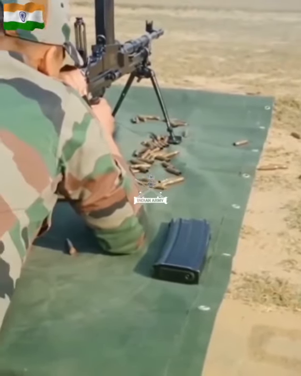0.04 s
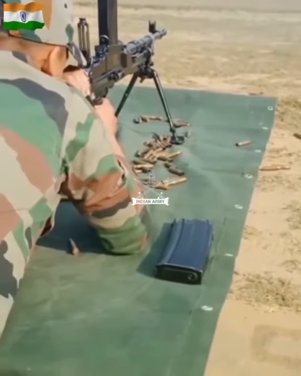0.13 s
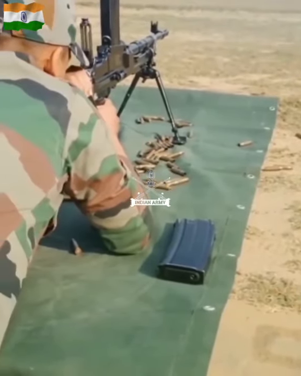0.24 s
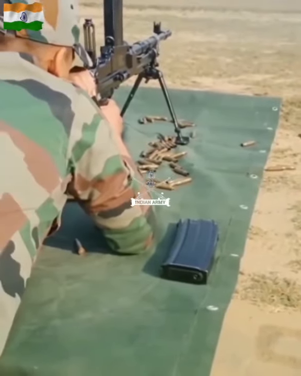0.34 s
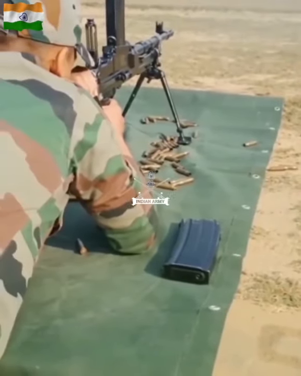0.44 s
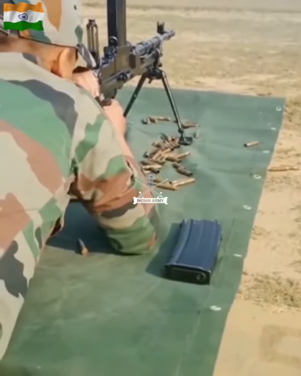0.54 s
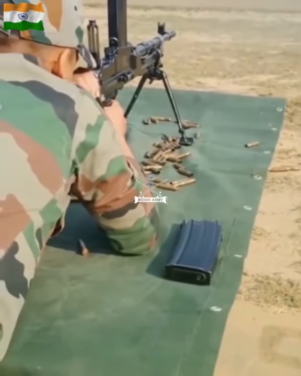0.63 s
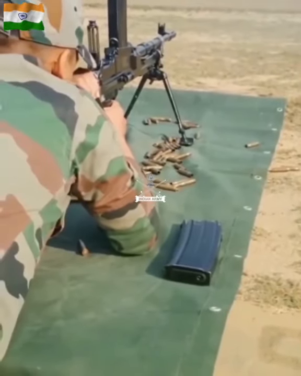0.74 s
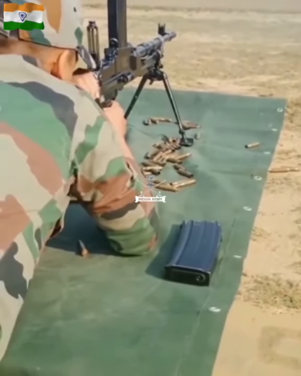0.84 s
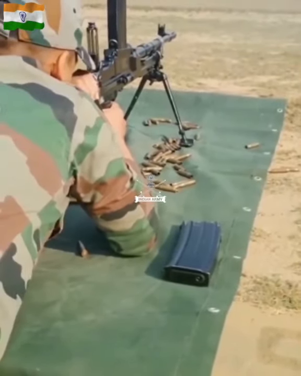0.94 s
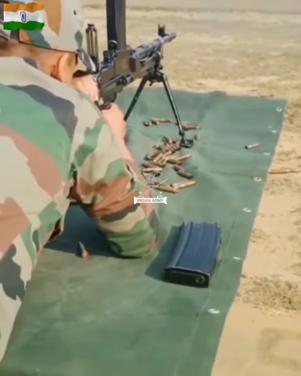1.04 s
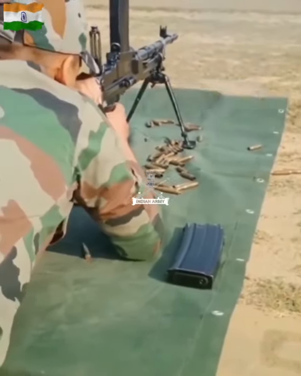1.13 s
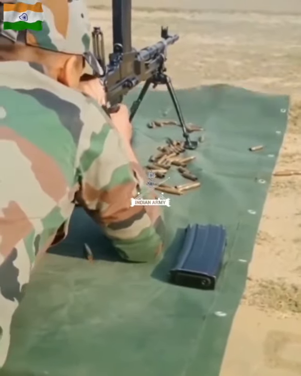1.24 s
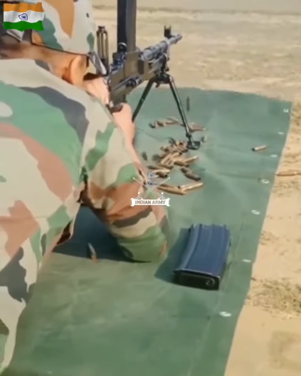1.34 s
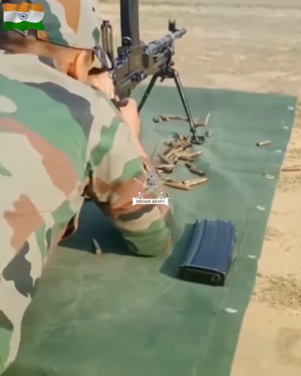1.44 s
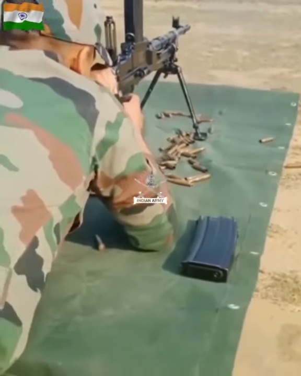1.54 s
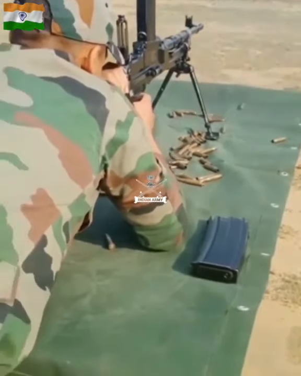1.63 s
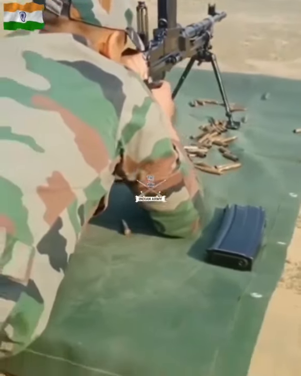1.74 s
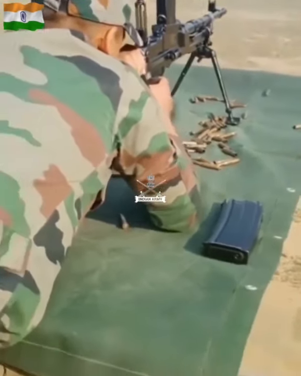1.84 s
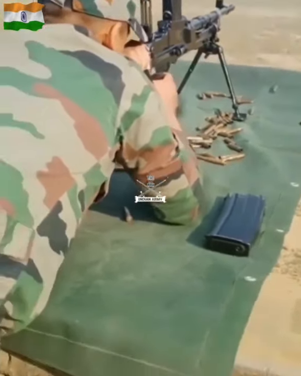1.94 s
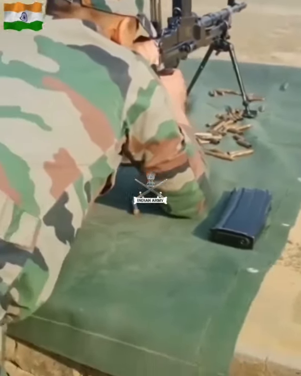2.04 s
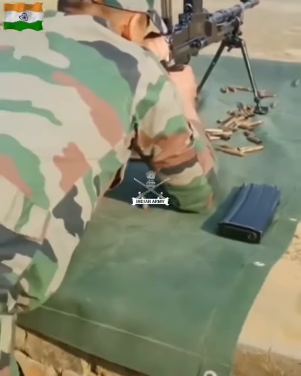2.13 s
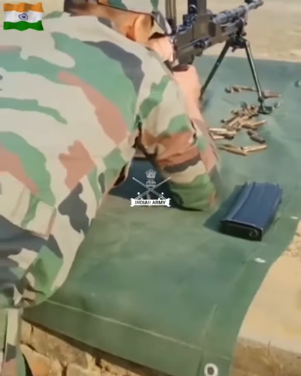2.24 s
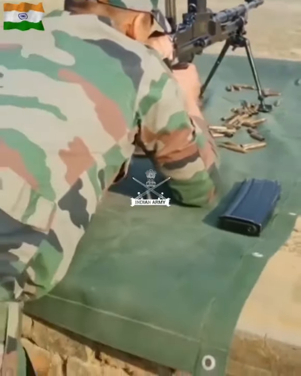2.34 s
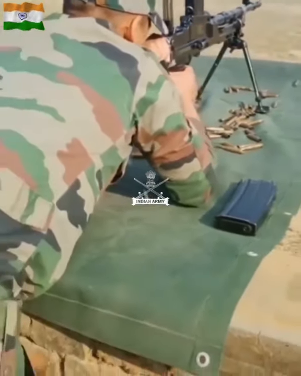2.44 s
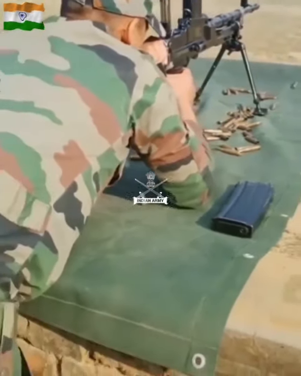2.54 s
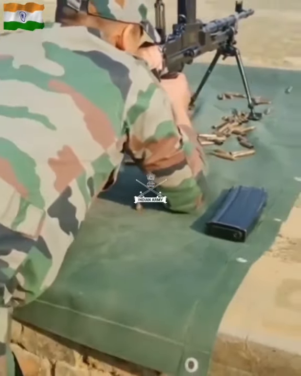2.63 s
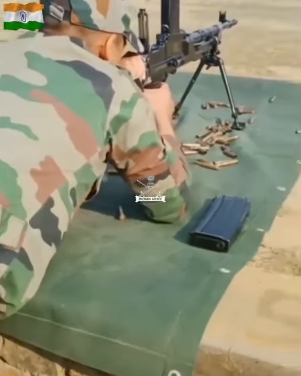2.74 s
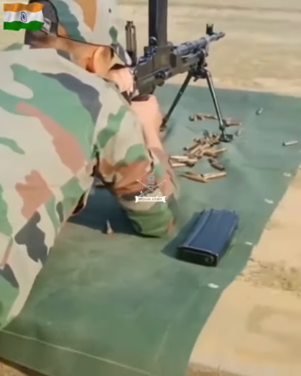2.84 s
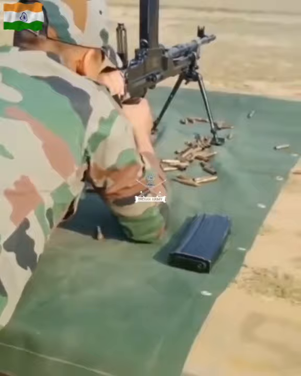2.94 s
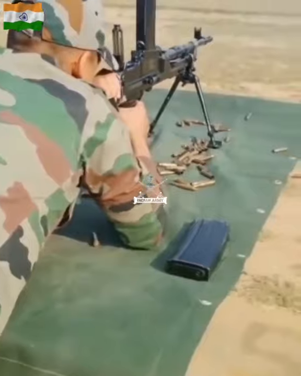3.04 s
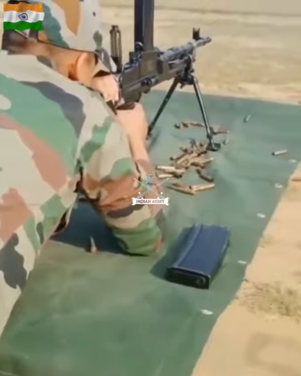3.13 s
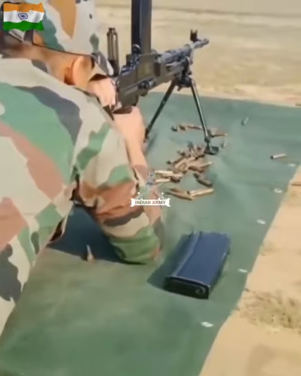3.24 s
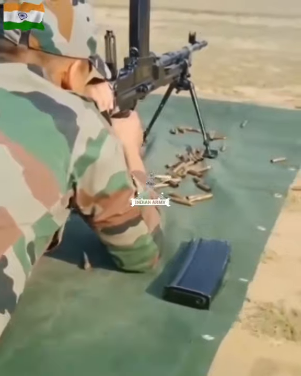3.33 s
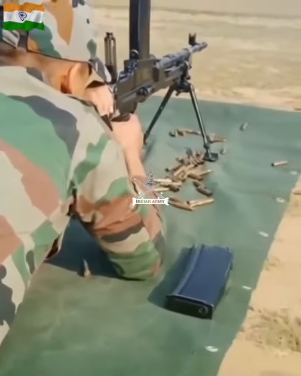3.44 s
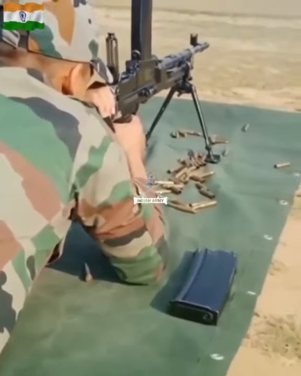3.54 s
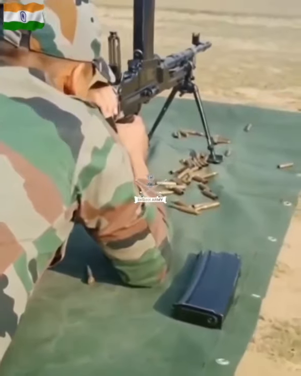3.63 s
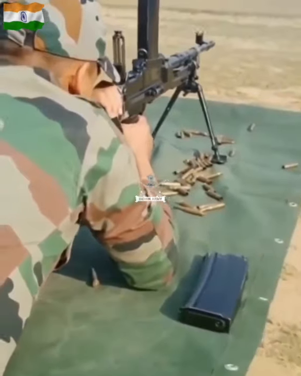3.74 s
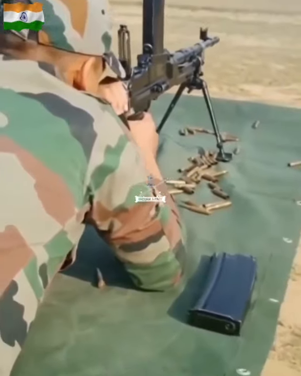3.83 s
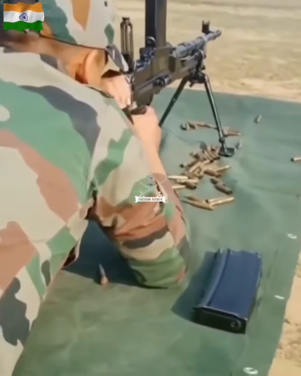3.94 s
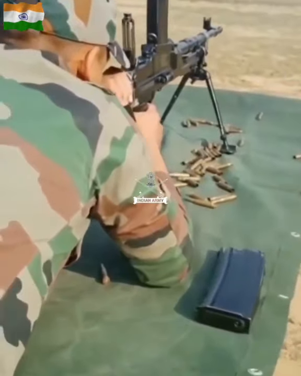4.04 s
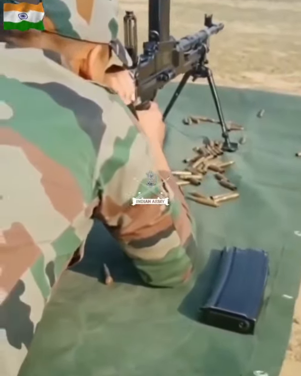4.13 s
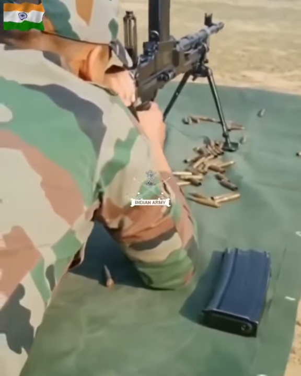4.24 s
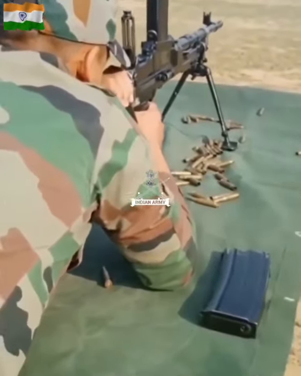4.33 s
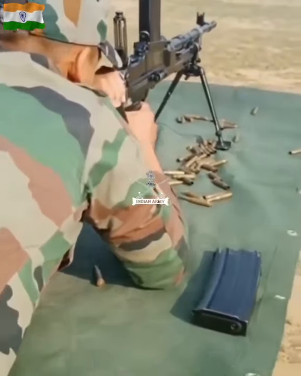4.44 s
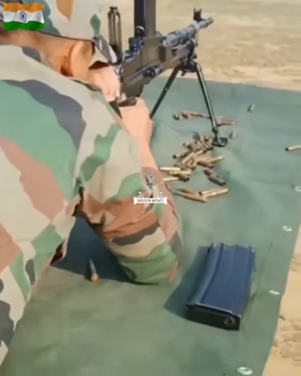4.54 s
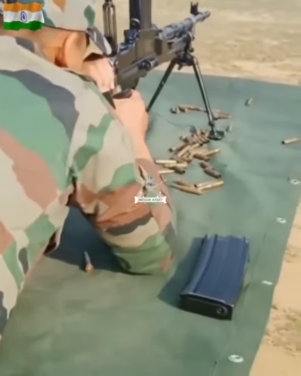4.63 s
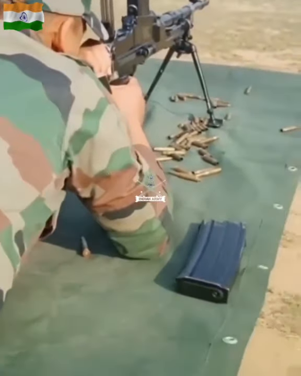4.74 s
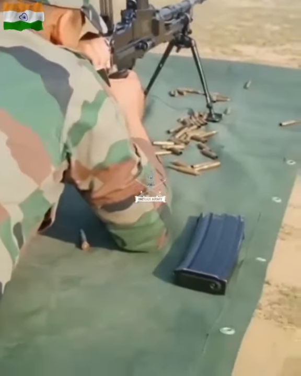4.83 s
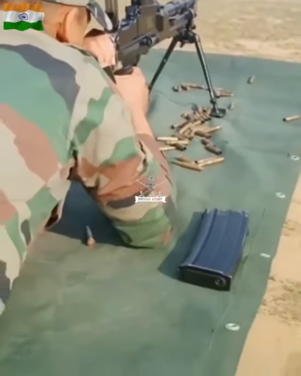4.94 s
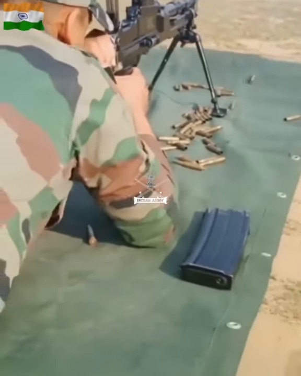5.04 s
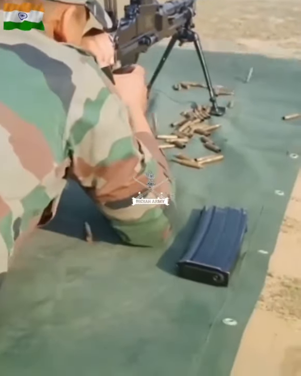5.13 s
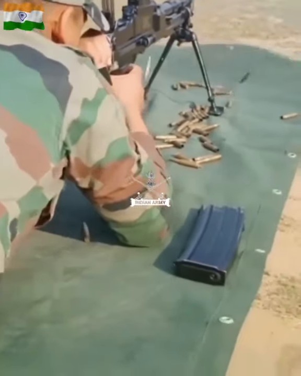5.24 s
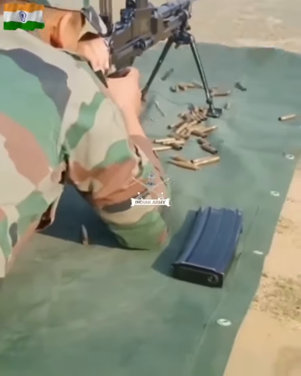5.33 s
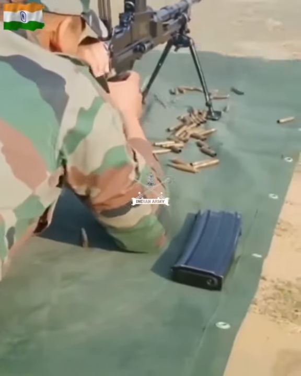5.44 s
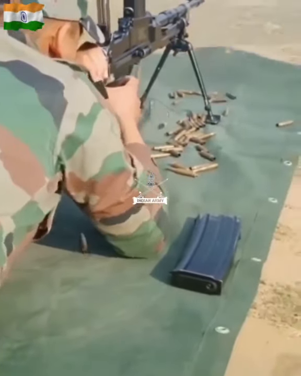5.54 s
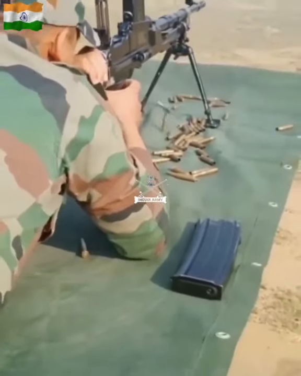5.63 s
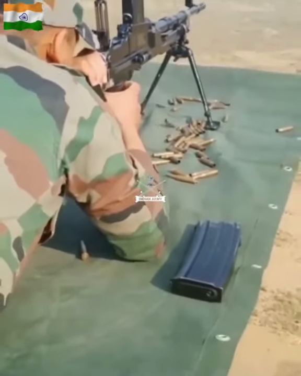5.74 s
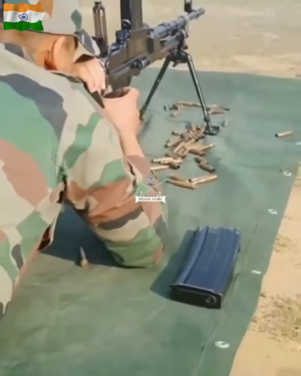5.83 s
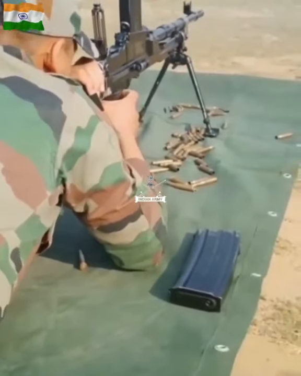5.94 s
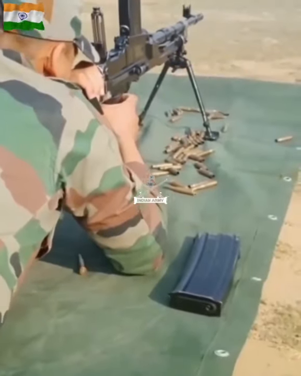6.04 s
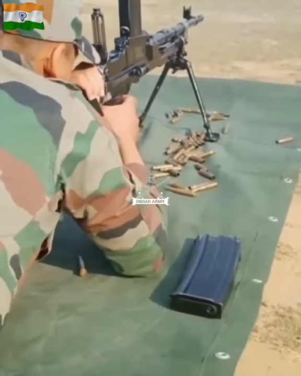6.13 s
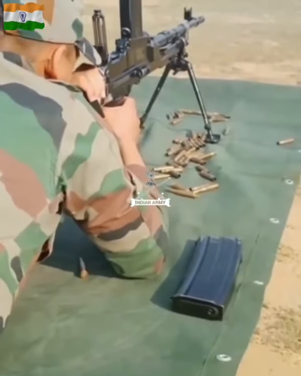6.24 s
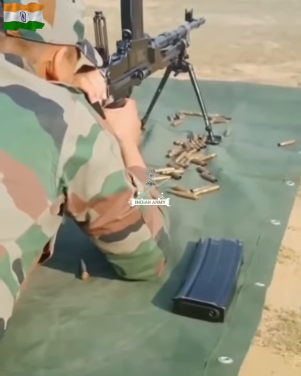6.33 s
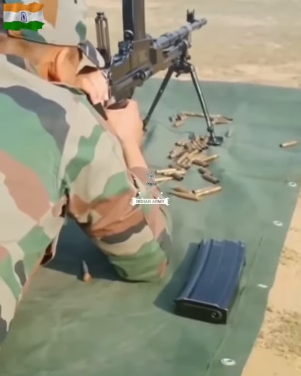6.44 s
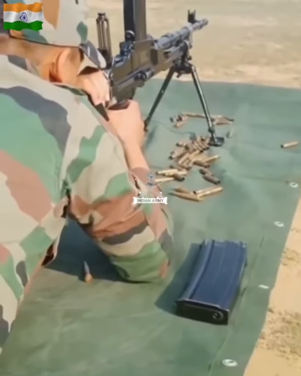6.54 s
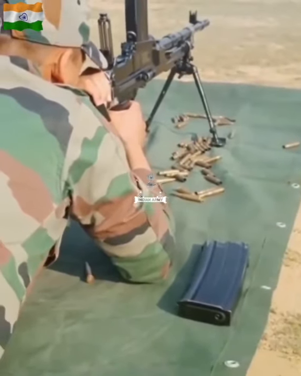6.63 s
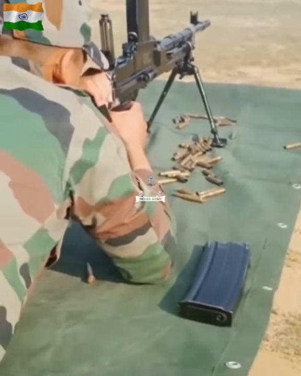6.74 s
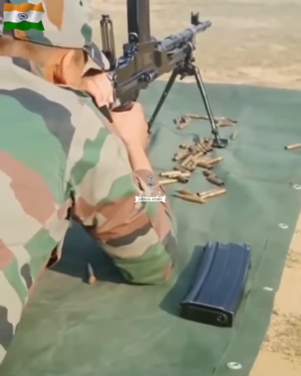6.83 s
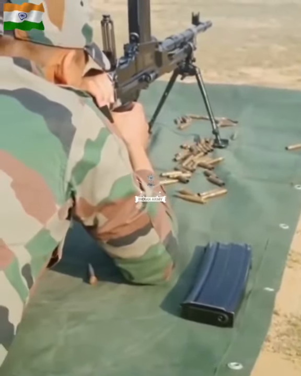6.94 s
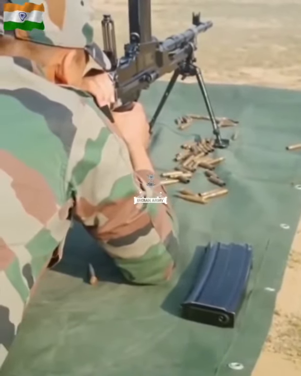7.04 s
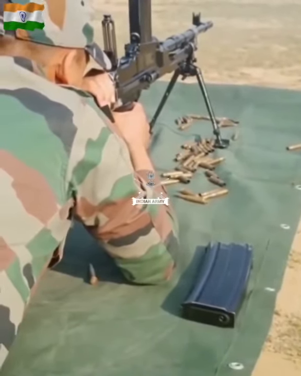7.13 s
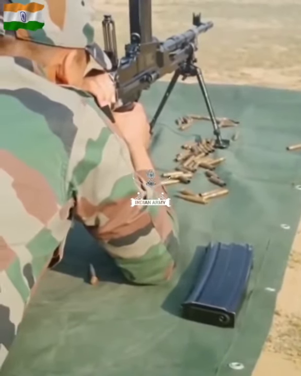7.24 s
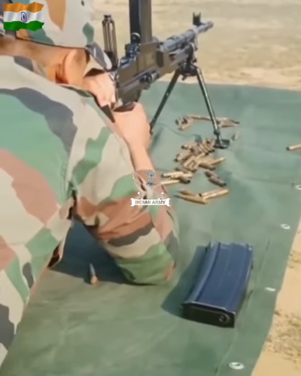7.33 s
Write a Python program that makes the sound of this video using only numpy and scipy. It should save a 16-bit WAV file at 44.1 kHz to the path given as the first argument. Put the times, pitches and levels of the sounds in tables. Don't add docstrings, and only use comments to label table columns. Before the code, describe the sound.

A light machine gun fires a three-round burst, then a louder four-round burst outdoors, with echoing rolls, metallic clacks, brass ticks and breeze between.

```python
import sys
import numpy as np
from scipy import signal
from scipy.fft import rfft, irfft, next_fast_len
from scipy.io import wavfile
from scipy.ndimage import uniform_filter1d, minimum_filter1d

SR = 44100
rng = np.random.default_rng(int(sys.argv[2]) if len(sys.argv) > 2 else 0)


def dump(signal):
    limited = np.clip(np.atleast_2d(signal).T, -1, 1)
    pcm = np.round(limited * 32767).astype(np.int16)
    wavfile.write(sys.argv[1], SR, pcm)


def voltage_ratio(decibels):
    exponent = np.asarray(decibels, float) / 20
    return 10 ** exponent


N = 325899
T = np.arange(N) / SR

# start_s, roar_db, boom_db, far_roll_db, slap_db
SHOTS = [
    (1.1652, -1.5, -9.5, -23, -3),
    (1.3035, -5, -12, -19.5, -4),
    (1.443, -9, -13, -23, -7),
    (5.1866, 0.5, -2, -15.5, -0.5),
    (5.3292, -1.5, -4, -14.5, -3),
    (5.4653, -2.5, -4, -20, -2.5),
    (5.6096, -7, -7, -21, -5),
]
# start_s, rounds, roll_fading_speed
BURSTS = [
    (1.1, 3, .95),
    (5.1, 4, 1.08),
]
# pitch_hz, level_db
ROAR_COLOUR = [(260, -28), (450, 0.5), (2090, -3), (2940, -4.5), (3300, -5), (4710, -3.5), (6440, -12),
               (7320, -3.5), (9870, -14.5), (12400, -15.5), (13500, -20.5)]
# full_at_s, hold_s, rise_db_per_s, fall_db_per_s, level_db
ROAR_SHAPE = [(.003, .012, 1699, 409.5, -1.5), (0.079, 0.07, 299.5, 1050.5, -25.5)]
# pitch_hz, level_db
GUST_COLOUR = [(21, -37), (35, -8), (272, 0.5), (415, -3), (516, -9), (658, -11.5), (830, -16),
               (900, -10.5), (1170, -41), (1980, -120)]
# full_at_s, hold_s, rise_db_per_s, fall_db_per_s, level_db
GUST_SHAPE = [(.006, .038, 3890, 637, -6)]
SWELL_S, SWELL_PER_DB = 0.019, 1.9
# full_at_s, hold_s, rise_db_per_s, fall_db_per_s, level_db
BOOM_SHAPE = [(0.031, 0.022, 900, 1903, -1.5), (.058, .011, 900, 1500, -13)]
BOOM_HZ, BOOM_WIDTH_HZ = 308, 120
BOOM_RISE_AT_S, BOOM_RISE_HZ_PER_S = .04, 5000
BOOM_WOBBLE_RAD, BOOM_NOISE = .3, .2
THUMP_HZ, THUMP_WIDTH_HZ, THUMP_DB = 80, 41, -19
THUMP_CYCLES, THUMP_LAG_S, THUMP_PULSE_DB = 1.6, .028, -14
# delay_s, pitch_hz, length_cycles, level_db
SLAP = [(.049, 900, 2.3, 0.6), (.0495, 1550, 4, -1.5), (0.036, 4700, 5, -16), (0.053, 370, 1.4, -4.5),
        (.062, 570, 1.3, -5.5)]
# delay_s, pitch_hz, length_cycles, level_db
ECHOES = [(.069, 615, 3.5, -8), (.098, 621, 2.5, -2), (.103, 478, 1.5, -7.5), (.108, 297.3, 1.8, -2.5),
          (.118, 569, 3, -1.5), (.122, 1725, 3.9, -9.5), (.126, 310, 3, -1.5), (.163, 330, 2.2, -3),
          (.19, 404, 3, -4), (.102, 810, 2.6, -8), (.121, 780, 2.8, -7.5)]
ECHO_DB, ECHO_SAG_DB = 0.2, 2.1
SCATTER_COUNT, SCATTER_DB = 40, -12.5
FAR_COUNT, FAR_DB, FAR_FALL_DB_PER_S = 70, -22, 27.5
# delay_s, level_db, t60_s
CRACKS = [(0.049, -10.5, 0.053), (0.1, -27, .05), (.119, -20, 0.11)]
# pitch_hz, level_db
CRACK_COLOUR = [(590, -28.5), (1000, 5), (2720, -6), (4590, -8), (9630, -13), (10500, -28.5),
                (12400, -13.5), (13500, -30)]
# start_s, peak_db, pitch_hz
RETURNS = [
    [(1.604, -15, 444), (1.71, -17, 366), (1.743, -15, 358), (1.768, -14, 400), (1.79, -15, 450),
     (1.827, -18, 447), (1.852, -17, 400), (1.918, -18, 460), (2.035, -23, 270), (2.055, -23, 330),
     (2.123, -27, 248), (2.15, -26, 300), (2.17, -25, 340), (2.188, -25, 380)],
    [(5.769, -14, 315), (5.865, -18, 345), (5.91, -13, 355), (5.93, -14, 340), (5.993, -18, 304),
     (6.024, -17, 312), (6.053, -17, 310), (6.094, -20, 361), (6.211, -23, 320), (6.29, -25, 310),
     (6.33, -26, 320), (6.35, -27, 320)],
]
RETURN_DB, RETURN_CYCLES, RETURN_LAG_S = -4, 3.5, .008
# pitch_hz, level_db
ROLL_COLOUR = [(24, -65), (40, -37), (142, -17.5), (172, -11.5), (309, -6.5), (350, -5.5), (405, -9),
               (643, -11), (760, -17), (1440, -18.5), (3540, -28.5), (4090, -23), (13500, -50.5)]
# full_at_s, hold_s, rise_db_per_s, fall_db_per_s, level_db
ROLL_SHAPE = [
    (0.051, 0.076, 655, 150, -3),
    (.3, .001, 283, 120, -7),
    (.3, .02, 280, 31, -5.5),
    (.3, 0.35, 285, 10.24, -27),
]
# pitch_hz, loss_after_1_s_db
AIR_LOSS = [(100, 11), (500, -1.5), (1500, 0), (2800, 3.5), (4500, 6.5), (8000, 28), (13000, 51)]
# full_at_s, hold_s, rise_db_per_s, fall_db_per_s, level_db
LIMITER = [
    (.001, 0.071, 9050, 238, -6.5),
    (.17, 0.0023, 55, 74.8, -8.5),
]
# start_s, peak_db, low_ring_hz, body_db, rattle_db
BOLT = [
    (0.5157, -16, 517, -6.5, -21),
    (1.096, -23, 1240, -8, -10.5),
    (4.1268, -11.5, 495, -7.5, -27.5),
    (4.1436, -28.5, 557, -16, -26),
    (4.3151, -11.5, 666, -4.5, -33.5),
    (5.1165, -8, 1380, -13.5, -13),
]
# start_s, peak_db, low_ring_hz, body_db, rattle_db
CATCH = [
    (2.3431, -20.5, 1671, -8, -19),
    (3.7854, -32.5, 1580, -11.5, -35),
    (7.3679, -27.5, 904, 0, -21),
]
# start_s, peak_db, low_ring_hz, body_db, rattle_db
SWIVEL = [
    (3.5311, -22.5, 1230, -10.5, -27),
    (3.6647, -46, 641, -3, -7.5),
    (4.6645, -44.5, 1580, 0, -17),
]
BOLT_HZ, CATCH_HZ, SWIVEL_HZ = 8000, 6120, 3850
CLACK_T60_S, RING_T60_S, BODY_T60_S, RATTLE_T60_S = 0.048, 0.043, 0.097, 0.16
# pitch_hz, level_db
CLACK_COLOUR = [(1290, -36.5), (2200, -10), (2940, -5), (3290, -6.5), (4810, -2), (5350, -5.5), (7580, 0.5),
                (9890, -10), (12400, -11), (13000, -8), (13500, -29)]
# pitch_hz, level_db
BODY_COLOUR = [(150, -40.5), (250, -3), (668, 0), (1210, -6), (1570, -5.5), (2120, -11), (2500, -14.5),
               (3250, -40.5), (5500, -120)]
# pitch_hz, level_db, t60_s
STEEL = [(1750, -0.5, 0.018), (2500, -18, 0.12), (4447, -22, 0.091), (5770, -8, 0.021), (6169, -28.5, 5.0),
         (7343, -23, 0.18), (8000, -1, 0.04), (9080, -15, 0.063), (10370, -19.5, 0.05), (10870, -19, 0.046)]
# pitch_hz, level_db, t60_s
RECEIVER = [(387, -5.5, 0.6), (1147, -14, 5.0), (1852, -8, 0.11), (2440, -4, 0.1), (2950, -0.5, 0.06),
            (3548, -17.5, 0.28), (4490, -6.5, 0.12), (4775, -5.5, 0.072), (5356, -28.5, 5.0),
            (5669, -9, 0.11)]
STRUCK_DB = -11
# start_s, end_s, level_db, body_db
SLIDES = [(1.108, 1.142, -29.5, -6), (1.13, 1.165, -38, -3.5), (1.152, 1.17, -27, -12.5),
          (5.128, 5.17, -25.5, -3.5), (5.16, 5.19, -27, -12), (0.538, 0.616, -52, -1.5),
          (0.716, .76, -67.5, 2), (4.66, 4.87, -61.5, 1.5), (4.298, 4.32, -41.5, -8),
          (4.111, 4.13, -47.5, -16), (0.63, 0.75, -74, -10.5), (3.74, 3.83, -54.5, 4),
          (7.345, 7.37, -59, -3)]
# start_s, peak_db, pitch_hz, t60_s
TICKS = [(1.05, -44, 6050, 0.058), (1.0654, -48, 5430, 0.065), (3.0075, -39, 6050, 0.028),
         (3.038, -45, 6120, 0.036), (3.014, -50, 7600, .03), (3.19, -46, 4900, .03),
         (2.665, -54, 6050, .04), (5.515, -15, 5400, .09), (5.233, -14, 6050, .05), (5.305, -17, 4500, .05),
         (3.191, -38.5, 6030, 0.057), (3.2316, -45, 6060, 0.036), (3.7524, -48, 4430, 0.046),
         (6.6218, -49, 6100, 0.044), (6.6498, -50, 6360, 0.066), (6.985, -54, 6084, 0.04)]
# start_s, peak_db, pitch_hz, t60_s
KNOCKS = [(4.492, -47, 510, .1), (4.995, -47, 510, .2), (4.68, -52, 760, .2), (4.7, -55, 1400, .08),
          (3.482, -44, 1800, .025), (4.215, -44, 330, .06), (4.34, -45.5, 330, 0.27),
          (3.559, -42.5, 850, 0.13), (3.708, -51, 1500, .04), (3.812, -50, 1500, .05),
          (4.165, -47, 1540, 0.14), (4.34, -56, 1600, .1), (4.667, -45, 1450, 0.037),
          (4.76, -51.5, 850, .08), (4.941, -48, 560, .2), (5.125, -31, 1400, 0.14)]
# start_s, peak_db, pitch_hz, length_cycles
THUDS = [(1.157, -26, 90, 1.1), (.396, -45, 560, 1.1), (.521, -27, 800, 1.4), (.53, -31, 430, 2.2),
         (4.129, -22, 900, 1.3), (4.141, -33, 450, 1.8), (4.3185, -19, 600, 1.8), (4.329, -28, 560, 1.7),
         (4.339, -31, 520, 1.8), (4.571, -42, 650, 1.3), (.722, -52, 700, 3.5)]
# start_s, end_s, rustle_db, scuff_db
SHIFTS = [(.5, .7, -71, -75), (2.88, 3.217, -68, -66), (3.406, 3.693, -58, -58), (3.63, 4.072, -66.5, -74),
          (4.049, 4.6, -62, -66), (2.6, 2.901, -80, -53.5), (3.17, 3.4, -74, -75), (4.48, 4.72, -69, -70),
          (4.9, 5.03, -75, -75)]
# pitch_hz, level_db
RUSTLE_COLOUR = [(1350, -26.5), (2300, -1.5), (4480, -2), (4860, -1.5), (6440, -7), (7980, 1.5),
                 (9530, -11), (11500, -14), (12600, -9), (13500, -11.5)]
RUSTLE_DROP_S, RUSTLE_DROP_DB = 5.3, -11
# start_s, end_s, start_hz, end_hz, level_db
BIRDS = [(.435, .515, 4500, 3300, -66.5), (.465, .51, 5700, 5200, -77), (.7, .775, 4350, 3350, -74),
         (.68, .72, 4250, 4350, -73), (.78, .99, 4620, 4520, -83), (3.215, 3.345, 4450, 4420, -66),
         (7.28, 7.345, 5200, 5150, -67), (.62, .99, 1150, 1150, -77), (2.36, 2.44, 4400, 4400, -60)]
# time_s, level_db
BREEZE_DB = [(0, -54.5), (.6, -54.5), (.8, -61), (1.04, -57.5), (2.75, -45.5), (3.28, -41.5), (3.64, -44),
             (4.32, -46.5), (4.91, -46.5), (6.9, -46), (7.33, -42.5)]
# pitch_hz, level_db
BREEZE_COLOUR = [(15, -49.5), (25, -15.5), (123, -2), (230, -9.5), (270, -8.5), (442, -16.5), (569, -21.5),
                 (600, -32), (780, -60.5), (1320, -120)]
# pitch_hz, level_db
HUM_COLOUR = [(290, -27.5), (500, -4.5), (805, -5.5), (924, -13), (1160, -17.5), (1500, -14.5),
              (2600, -23.5), (3380, -56), (5720, -120)]
HUM_DB, CLOTH_DB = -15.5, -26
# pitch_hz, level_db
HAZE_COLOUR = [(900, -20), (1500, 0), (2500, -6.5), (3600, -5), (4300, -1), (4900, -7.5), (7000, -21),
               (11000, -38.5), (13000, -52)]
HAZE_DB, HAZE_PER_DB = -80, .6
MIC_LOW_HZ, TOP_HZ, CEILING = 58, 13300, .9
NOISE_FILL_HZ, NOISE_FILL_DB = 4310, -5
HOLE_HZ, HOLE_SHARE = (9800, 12200), .12


def colour(table, hz):
    pitch_hz, level_db = np.transpose(table)
    return np.interp(np.log(hz + 1), np.log(pitch_hz), level_db)


def noise(table):
    size = next_fast_len(N)
    gain = voltage_ratio(colour(table, np.fft.rfftfreq(size, 1 / SR)))
    x = irfft(rfft(rng.standard_normal(size)) * gain, size)[:N]
    return x / np.std(x)


def band(hz, width_hz):
    table = []
    for octave in np.linspace(-3, 3, num=49):
        offset = abs(2 ** octave - 2 ** -octave) * hz / width_hz
        table.append((hz * 2 ** octave, -20 * np.log10(1 + offset ** 2)))
    return noise(table)


def walk(rate_hz):
    k = int(SR / rate_hz)
    steps = np.repeat(rng.standard_normal(N // k + 1), k)
    return 1.16 * uniform_filter1d(uniform_filter1d(steps, k), k)[:N]


def fade(s, rise_s, t60_s):
    t60_s = max(t60_s, .005)
    out, near = np.zeros(N), slice(max(int((s - .1) * SR), 0), int((s + 2 * t60_s) * SR))
    t = T[near] - s
    out[near] = np.exp(np.where(t < 0, t / rise_s, -np.log(1000) * t / t60_s))
    return out


def hump(start_s, end_s):
    return np.sin(np.pi * np.clip((T - start_s) / (end_s - start_s), 0, 1))


def slopes(t, at_s, hold_s, rise, fall):
    return np.maximum(np.minimum(0, np.minimum(rise * (t - at_s), fall * (at_s + hold_s - t))), -200)


def shape(t, parts):
    return np.sqrt(sum(voltage_ratio(db + slopes(t, *timing)) ** 2 for *timing, db in parts))


def add(out, s, piece):
    i = int(s * SR)
    out[i:i + len(piece)] += piece[:N - i]


def add_pulse(out, s, db, hz, cycles):
    t = T[:int(SR / 25)] - 1 / 50
    bell = np.exp(-(t * hz / cycles * np.pi) ** 2)
    add(out, s - 1 / 50, voltage_ratio(db) * bell * np.sin(2 * np.pi * hz * t))


def around(s):
    return slice(int((s - .05) * SR), int((s + .35) * SR))


def muzzle_blast():
    roar = noise(ROAR_COLOUR) * voltage_ratio(1.8 * walk(250))
    push = noise(GUST_COLOUR) + voltage_ratio(THUMP_DB) * band(THUMP_HZ, THUMP_WIDTH_HZ)
    out = np.zeros(N)
    for s, roar_db, *_ in SHOTS:
        near = around(s)
        t = T[near] - s
        rise_s = max(SWELL_S * voltage_ratio(SWELL_PER_DB * roar_db), .001)
        swell = 1 - 0.61 * np.exp(-np.maximum(t, 0) / rise_s)
        out[near] += voltage_ratio(roar_db - 5.5) * shape(t, ROAR_SHAPE) * swell * roar[near]
        out[near] += voltage_ratio(roar_db - 4.5) * shape(t, GUST_SHAPE) * swell * push[near]
    return out


def ground_boom():
    rough = band(BOOM_HZ, BOOM_WIDTH_HZ)
    out = np.zeros(N)
    for s, _, boom_db, _, slap_db in SHOTS:
        near = around(s)
        t = T[near] - s
        bend = BOOM_RISE_HZ_PER_S / 2 * np.clip(t - BOOM_RISE_AT_S, 0, 1) ** 2
        tone = np.sin(2 * np.pi * (BOOM_HZ * t + bend) + BOOM_WOBBLE_RAD * walk(60)[near])
        out[near] += voltage_ratio(boom_db) * shape(t, BOOM_SHAPE) * (tone + BOOM_NOISE * rough[near])
        add_pulse(out, s + THUMP_LAG_S, slap_db + THUMP_PULSE_DB, THUMP_HZ, THUMP_CYCLES)
    return out


def echoes():
    crack, faces = noise(CRACK_COLOUR), list(ECHOES)
    for a, b, c in rng.random((SCATTER_COUNT, 3)):
        faces.append((.06 + .24 * a, 260 * 4 ** (b * b), 2.5, SCATTER_DB - 8 * c - 6 * a))
    for a, b, c in rng.random((FAR_COUNT, 3)):
        far_db = FAR_DB - 8 * c - FAR_FALL_DB_PER_S * 0.9 * a
        faces.append((.3 + .8 * a, 280 * 9 ** (b * b), 3.5, far_db))
    out = np.zeros(N)
    rounds = np.concatenate([np.arange(count) for _, count, _ in BURSTS])
    for (s, roar_db, boom_db, _, slap_db), k in zip(SHOTS, rounds):
        for lag_s, db, t60_s in CRACKS:
            out += voltage_ratio(roar_db + db) * fade(s + lag_s, 0.00063, t60_s) * crack
        echo_db = (slap_db + boom_db) / 2 + ECHO_DB - ECHO_SAG_DB * k
        for group, db in ((SLAP, slap_db), (faces, echo_db)):
            for lag_s, hz, cycles, face_db in group:
                add_pulse(out, s + lag_s, db + face_db, hz, cycles)
    for burst in RETURNS:
        for s, db, hz in burst:
            add_pulse(out, s + RETURN_LAG_S, db + RETURN_DB, hz, RETURN_CYCLES)
    return out


def far_roll():
    out, lumps, t = 0, walk(30), T[::64]
    gains_db = [np.minimum(db - slopes(t - shot[0], *timing), 0) for shot in SHOTS for *timing, db in LIMITER]
    gain_db = np.min(gains_db, axis=0)
    speeds = np.concatenate([[speed] * count for _, count, speed in BURSTS])
    ages, sizes = [], []
    for (s, _, _, roll_db, _), speed in zip(SHOTS, speeds):
        age = t - s + (speed - 1) * np.maximum(t - s - .3, 0)
        ages.append(age)
        sizes.append(voltage_ratio(roll_db) * shape(age, ROLL_SHAPE))
    for hz in 45 * 2 ** np.arange(0, 8.4, .5):
        power = 0
        for size, age in zip(sizes, ages):
            loss_db = colour(AIR_LOSS, hz) * (np.clip(age, 0, 3) ** 1.8 - 0.17)
            power = power + (size * voltage_ratio(-loss_db)) ** 2
        depth_db = min(2.4, 1.2 + 900 / hz)
        patchy_db = depth_db * (.3 * lumps + .9 * walk(30)) + .5 * walk(6)
        level = np.interp(T, t, np.sqrt(power) * voltage_ratio(gain_db))
        band_db = colour(ROLL_COLOUR, hz) + 10 * np.log10(hz / 300)
        out = out + voltage_ratio(band_db + patchy_db) * level * band(hz, hz / 2.13)
    return out


def rattle():
    return noise(CLACK_COLOUR) * voltage_ratio(2.5 * walk(150) + 2.5 * walk(700))


def action_clacks():
    bright = noise(CLACK_COLOUR) * voltage_ratio(1.6 * walk(600))
    body, loose = noise(BODY_COLOUR), rattle()
    steel = sum(voltage_ratio(db) * band(hz, 60 + 1.8 / t60_s) for hz, db, t60_s in STEEL)
    steel = 0.6 * steel / np.std(steel)
    out, t = np.zeros(N), T[:SR // 5]
    parts = ((BOLT_HZ, BOLT), (CATCH_HZ, CATCH), (SWIVEL_HZ, SWIVEL))
    for high_hz, s, db, low_hz, body_db, rattle_db in [(hz, *row) for hz, rows in parts for row in rows]:
        out += voltage_ratio(db - 6.5) * fade(s + 0.0025, 0.0022, CLACK_T60_S) * bright
        for hz, mode_db, t60_s in list(RECEIVER) + [(low_hz, 1.5, .08)]:
            detune, uneven = rng.standard_normal(2)
            decay = voltage_ratio(1.9 * uneven - 60 * t / min(t60_s, .07)) * np.minimum(t / .0015, 1)
            ring = np.sin(2 * np.pi * hz * (1 + .02 * detune) * t) * decay
            add(out, s, voltage_ratio(db + body_db + STRUCK_DB + mode_db) * ring)
        out += voltage_ratio(db - 11.5 + body_db) * fade(s + .003, 0.0013, BODY_T60_S) * body
        rings = steel + band(high_hz, 250) + voltage_ratio(body_db) * band(low_hz, 120)
        out += voltage_ratio(db - 10) * fade(s + .002, .001, RING_T60_S) * rings
        shaken = loose + voltage_ratio(body_db) * body
        out += voltage_ratio(db + rattle_db) * fade(s + 0.011, 0.0059, RATTLE_T60_S) * shaken
    return out


def scrapes():
    loose, body = rattle(), noise(BODY_COLOUR)
    out = np.zeros(N)
    for start_s, end_s, db, body_db in SLIDES:
        out += voltage_ratio(db) * np.maximum(hump(start_s, end_s), 0) ** 1.3 * (loose + voltage_ratio(body_db) * body)
    return out


def brass_ticks():
    click, out = noise(CLACK_COLOUR), np.zeros(N)
    for s, db, hz, t60_s in TICKS:
        out += voltage_ratio(db - 8) * fade(s + 0.0016, 0.0007, t60_s) * (band(hz, 200) + 0.58 * click)
    return out


def knocks_and_thuds():
    waver, out = 1.1 * walk(90), np.zeros(N)
    for s, db, hz, t60_s in KNOCKS:
        out += voltage_ratio(db - 2.5) * fade(s + 0.0021, 0.0029, t60_s) * np.sin(2 * np.pi * hz * T + waver)
    for s, db, hz, cycles in THUDS:
        add_pulse(out, s, db, hz, cycles)
    return out


def wind_level():
    return np.interp(T, *np.transpose(BREEZE_DB))


def cloth_rustle():
    level = voltage_ratio(wind_level() + CLOTH_DB + RUSTLE_DROP_DB * (T > RUSTLE_DROP_S))
    for start_s, end_s, db, _ in SHIFTS:
        level = level + voltage_ratio(db) * hump(start_s, end_s)
    cloth, swell_db = noise(RUSTLE_COLOUR), 1.6 * walk(7)
    dull = signal.sosfilt(signal.butter(4, 5500, fs=SR, output="sos"), cloth)
    grains = sum(part * voltage_ratio(swell_db + 1.4 * walk(30) + 1.4 * walk(270)) for part in (dull, cloth - dull))
    return level * grains


def birds():
    out = 0
    for start_s, end_s, start_hz, end_hz, db in BIRDS:
        part = np.clip((T - start_s) / (end_s - start_s), 0, 1)
        phase = 2 * np.pi * np.cumsum(start_hz + (end_hz - start_hz) * part ** 0.66) / SR
        blur = 1.0 + .7 * (walk(400) + 1j * walk(400))
        out = out + voltage_ratio(db) * np.sin(np.pi * part) ** .35 * np.real(blur * np.exp(1j * phase))
    return out


def surroundings():
    wind_db = wind_level()
    breeze = voltage_ratio(wind_db + 2.0 * walk(14)) * noise(BREEZE_COLOUR)
    hum_level = voltage_ratio(wind_db + HUM_DB)
    for start_s, end_s, _, scuff_db in SHIFTS:
        hum_level = hum_level + voltage_ratio(scuff_db) * hump(start_s, end_s)
    hum = hum_level * voltage_ratio(0.43 * walk(25)) * noise(HUM_COLOUR)
    haze_db = HAZE_DB + HAZE_PER_DB * (wind_db - wind_db.min())
    haze = voltage_ratio(haze_db + 1.8 * walk(3.7) + 1.5 * walk(25)) * noise(HAZE_COLOUR)
    return breeze + hum + haze


def scene():
    shots = muzzle_blast() + ground_boom() + echoes() + far_roll()
    handling = action_clacks() + scrapes() + brass_ticks() + knocks_and_thuds() + cloth_rustle()
    mono = shots + handling + birds() + surroundings()
    return np.array([mono, mono])


def tiles(size, bins, frames, share):
    draw = rng.random((size[0] // bins + 1, size[1] // frames + 1)) > share
    return np.repeat(np.repeat(draw, bins, axis=0), frames, axis=1)[:size[0], :size[1]]


def low_pass(x):
    return signal.sosfilt(signal.butter(12, 14430, fs=SR, output="sos"), x)


def record(dry):
    mid = signal.sosfilt(signal.butter(2, MIC_LOW_HZ, "high", fs=SR, output="sos"), dry[0])
    mid = np.tanh(1.2 * mid) / 1.2
    mid = signal.sosfilt(signal.ellip(10, .2, 70, TOP_HZ, fs=SR, output="sos"), mid)
    hz, _, spec = signal.stft(mid, SR, nperseg=1024)
    smooth = np.sqrt(uniform_filter1d(np.abs(spec) ** 2, size=15, axis=0))
    treble_db = 10 * np.log10(np.sum(smooth[hz > NOISE_FILL_HZ] ** 2, axis=0) + 1e-12)
    steady = np.diff(treble_db, prepend=treble_db[0]) < 11
    calm = minimum_filter1d(1. * steady, size=5, origin=1)
    treble = ((hz > NOISE_FILL_HZ) & (hz < TOP_HZ))[:, None]
    filled = tiles(spec.shape, 30, 6, .2) * calm * treble
    random_phase = np.exp(2j * np.pi * rng.random(spec.shape))
    fill = voltage_ratio(NOISE_FILL_DB + 3.5) * smooth * (hz[:, None] / 6000) ** .3 * filled * random_phase
    high = ((hz > HOLE_HZ[0]) & (hz < HOLE_HZ[1]))[:, None]
    kept = np.where(high & (calm > 0) & (treble_db > -62), tiles(spec.shape, 8, 9, HOLE_SHARE), 1)
    mid, side = (signal.istft(part * kept, SR, nperseg=1024)[1][:N] for part in (spec, fill))
    mix = np.clip([mid + side, mid - side], -CEILING, CEILING)
    return low_pass(mix)


dry = scene()
out = record(dry)
dump(out)
```